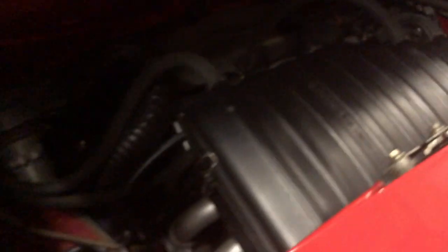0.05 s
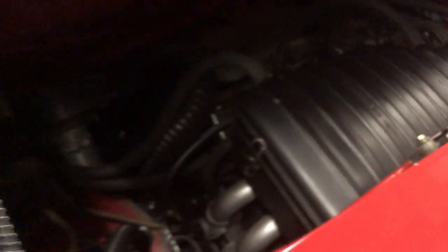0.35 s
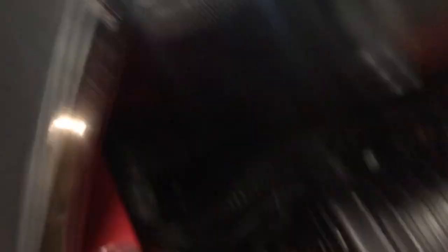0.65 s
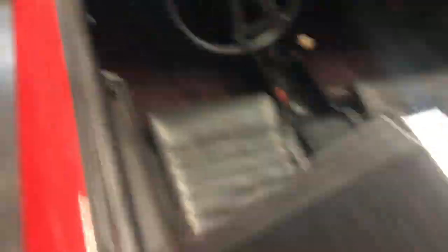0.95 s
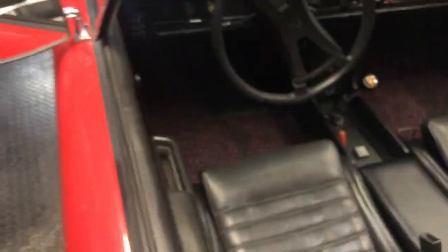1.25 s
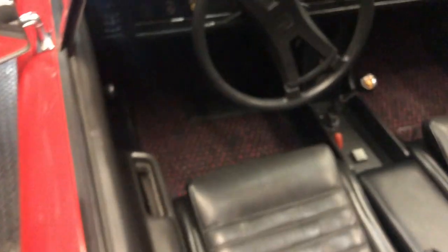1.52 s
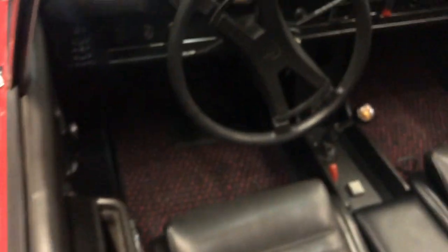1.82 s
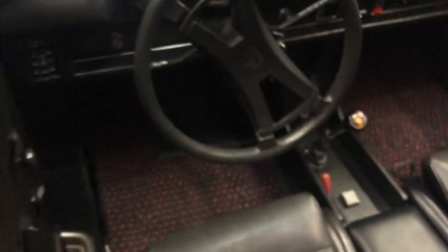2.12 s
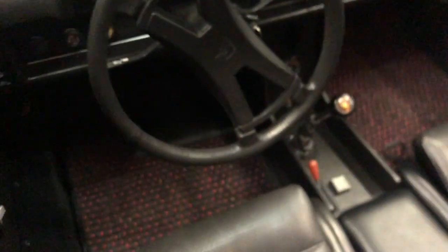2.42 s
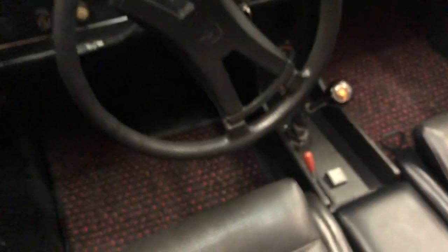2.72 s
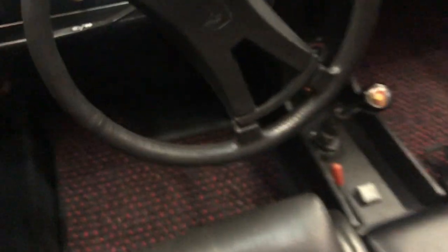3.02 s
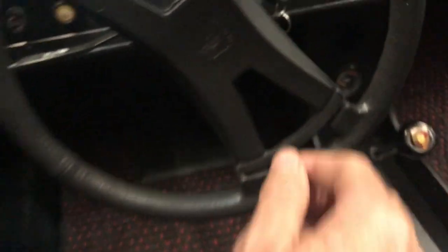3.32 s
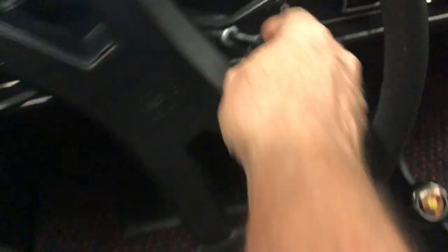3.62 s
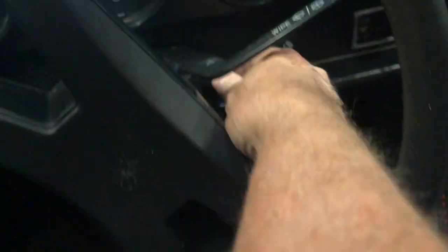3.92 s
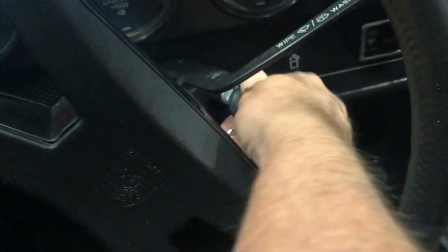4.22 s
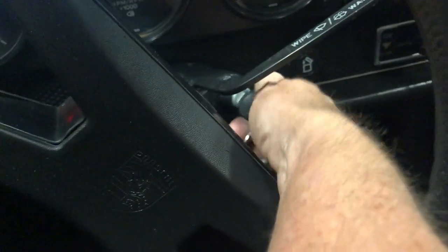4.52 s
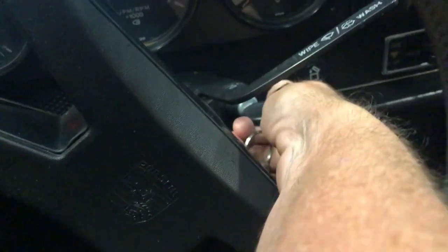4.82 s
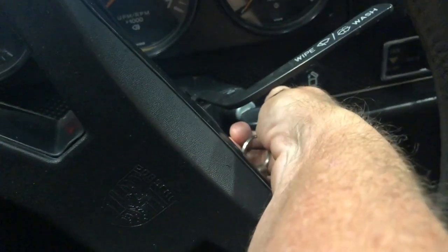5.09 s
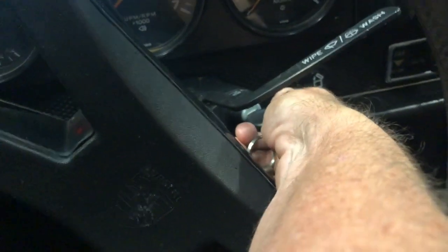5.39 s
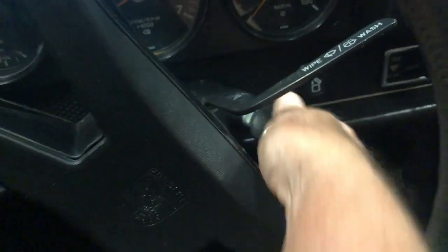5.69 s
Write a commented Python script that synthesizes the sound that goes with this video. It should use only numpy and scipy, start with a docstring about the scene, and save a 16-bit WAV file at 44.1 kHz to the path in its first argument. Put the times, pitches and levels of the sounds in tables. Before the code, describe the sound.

A sleeve rustles and a key clicks into a car ignition, then the starter whines and cranks until the engine catches.

```python
"""Cold start of a sports car

In a garage, heard from the open driver's door, a sleeve rustles over the ventilation.
The key slides into the lock and turns. The starter's gears whine, rasping as the pistons squeeze air.
The cylinders catch one by one, and their puffs ring the exhaust until the engine swells into a roar."""
import sys
import numpy as np
from scipy import signal
from scipy.fft import rfft, irfft, next_fast_len
from scipy.io import wavfile
from scipy.ndimage import uniform_filter1d

SR = 44100
rng = np.random.default_rng(int(sys.argv[2]) if len(sys.argv) > 2 else 0)


def master_out(mix):
    """Clip the mix to full scale and print it as 16-bit PCM to the path in sys.argv[1]."""
    frames = np.transpose(np.atleast_2d(mix))
    ceiling = np.clip(frames, -1, 1)
    pcm = np.round(ceiling * 32767).astype(np.int16)
    wavfile.write(sys.argv[1], SR, pcm)


N = 253575
TIME = np.arange(N) / SR
COMPRESSION_S = 0.142  # time from one squeeze of a piston to the next
CATCH_S, UNLOAD_S = 5.33, 0.07  # when the engine takes over from the starter, and how long that takes

# The hiss of sliding cloth or metal. Each row: pitch in Hz, relative level in dB.
FRICTION_SPECTRUM = [(700, 3.5), (1500, -7.5), (2500, -3.5), (4500, -4), (7000, -7), (11000, -10),
                     (16000, -12.5)]
# Surges of effort, first against compression, then as cylinders catch.
# Each row: start in seconds, hold in seconds, force in dB, gear rasp in dB.
EFFORT_SURGES = [(4.624, 0.0058, -35.5, -37), (4.734, .005, -46.5, -34.5), (4.804, 0.032, -42, -62),
                 (4.858, 0.0069, -35.5, -39), (4.945, 0.045, -36.5, -56), (5.032, .11, -37.5, -52.5),
                 (5.208, 0.079, -37.5, -64), (5.33, 0.076, -31.5, -43.5), (5.453, 0.11, -28.5, -37.5),
                 (5.598, .075, -29, -34)]
# The notes at which the exhaust rings in the garage. Each row: pitch in Hz, width in Hz, gain in dB.
EXHAUST_RESONANCES = [(43.7, 8.1, -5), (57, 6.2, 1), (73.3, 14, 3), (87.7, 12, -4), (132.7, 9.1, -3),
                      (143.6, 5.2, 0), (207, 15, -1.5), (237, 11, -14), (274, 25, -18)]


def amp(db):
    """Turn decibels into a gain."""
    return 10 ** (np.asarray(db) / 20)


def unit(x):
    """Scale x to an average (rms) level of 1."""
    return x / np.sqrt(np.mean(x ** 2))


def curve(table):
    """Join (seconds, value) points with straight lines, one value a sample."""
    return np.interp(TIME, *np.transpose(table))


def noise():
    """White noise, an even hiss."""
    return rng.standard_normal(N)


def wander(rate):
    """A random drift of size about 1 that changes rate times a second."""
    hold = int(SR / rate)
    steps = np.repeat(rng.standard_normal(N // hold + 1), hold)
    return unit(uniform_filter1d(steps, hold)[:N])


def colour(x, spectrum):
    """Shape the lows and highs of x with (Hz, dB) points; the result has level 1."""
    hz, db = np.transpose(spectrum)
    size = next_fast_len(2 * N)
    bin_hz = np.maximum(np.fft.rfftfreq(size, 1 / SR), 1)
    gain = amp(np.interp(np.log(bin_hz), np.log(hz), db))
    return unit(irfft(rfft(x, size) * gain, size)[:N])


def band(x, hz, width):
    """One resonance: keep a band of x, width Hz wide, around hz."""
    hz = min(hz, .45 * SR)
    angle = 2 * np.pi * hz / SR
    damping = np.sin(angle) * width / hz / 2
    feedback = [1 + damping, -2 * np.cos(angle), 1 - damping]
    return signal.lfilter([damping, 0, -damping], feedback, x + 1e-18)


def resonate(x, modes):
    """Let x ring several resonances side by side."""
    return sum(amp(db) * band(x, hz, width) for hz, width, db in modes)


def fade(t60, rise):
    """Times and a loudness shape that grows for rise seconds, then drops 60 dB in t60 seconds."""
    t = TIME[:SR // 2]
    attack = np.sin(np.pi / 2 * np.minimum(t / rise, 1)) ** 2
    return t, attack * np.exp(-np.log(1000) * np.maximum(t - rise, 0) / t60)


def swell(s, length):
    """A smooth rise and fall around s seconds."""
    return np.exp(-2 * ((TIME - s) / length) ** 2)


def surge(s, hold, t60, rise=0.025):
    """One surge of effort rises at s seconds, holds and dies away."""
    t = TIME - s
    attack = np.sin(np.pi / 2 * np.clip(t / rise, 0, 1)) ** 2
    return attack * np.exp(-np.log(1000) * np.maximum(t - rise - hold, 0) / t60)


def add(out, s, x):
    """Mix x into out at s seconds."""
    start = min(int(s * SR), N)
    out[start:start + len(x)] += x[:N - start]


def garage(x, t60, wet_db):
    """Add dense echoes from the cabin and the walls, at wet_db relative to x."""
    t, envelope = fade(t60, rise=0.0088)
    echo = envelope * rng.standard_normal(len(t))
    return x + amp(wet_db) * signal.fftconvolve(x, echo / np.linalg.norm(echo))[:N]


def ventilation(air_db=-61, hum_far_db=-66.5, hum_near_db=-59.5):
    """Moving air, a motor hum and fan tones change as the listener walks to the door."""
    # The rush of air. Each row: pitch in Hz, relative level in dB.
    air_spectrum = [(15, -21), (25, -3.5), (64, 3), (180, -2.5), (236, -4), (301, -5), (365, -8), (460, -5),
                    (607, -5.5), (796, -12), (960, -12), (1480, -24), (4610, -29), (14800, -39),
                    (16000, -37)]
    # Fan tones, each loudest at one spot on the way.
    # Each row: pitch in Hz, level in dB, loudest moment in seconds, spread in seconds.
    fan_tones = [(183, -67, 1.6, .5), (237, -68, 1.02, 0.33), (296.5, -71, 0.97, 1.2),
                 (601, -67.5, 0.85, 0.31), (600, -65.5, 1.68, 0.44)]
    passing_fan_db = 2.5 * swell(1.09, length=1.68)
    air = colour(noise(), air_spectrum) * amp(air_db + passing_fan_db + 0.25 * wander(12))
    air = signal.sosfilt(signal.butter(2, 35, "highpass", fs=SR, output="sos"), air)
    near_door = .5 + .5 * np.tanh((TIME - 1.83) / 0.31)
    hum_db = hum_far_db + (hum_near_db - hum_far_db) * near_door
    hum = np.sqrt(2) * np.sin(2 * np.pi * 56.6 * TIME + 0.28 * wander(6.7))
    air += hum * amp(hum_db + 2.8 * wander(7.5))
    # at one spot the garage's standing wave cancels most of the bass
    bass = signal.sosfiltfilt(signal.butter(2, 140, fs=SR, output="sos"), air)
    air -= 0.82 * swell(1.07, length=0.35) * bass
    for hz, db, s, spread in fan_tones:
        nearness = 1 / (1 + ((TIME - s) / spread) ** 2)
        level = nearness * amp(db + 1.6 * wander(5.83))
        air += level * np.sqrt(2) * np.sin(2 * np.pi * hz * TIME + 0.63 * wander(12))
    return air


def sleeve(rest_db=-78, creaks_per_s=45, creak_db=-15):
    """Cloth slides with a soft, grainy hiss and tiny creaks."""
    # One swish for each move of the arm. Each row: middle in seconds, length in seconds, level in dB.
    swishes = [(.2, .22, -76), (0.578, 0.13, -67.5), (0.817, 0.067, -68.5), (0.968, 0.13, -66),
               (1.212, 0.26, -64.5), (1.483, 0.096, -66), (1.73, 0.34, -67.5), (2.308, 0.2, -68),
               (2.51, 0.061, -67), (2.853, 0.32, -64), (3.225, 0.27, -66), (3.702, 0.53, -71)]
    swish_power = sum((amp(db) * swell(s, length)) ** 2 for s, length, db in swishes)
    motion = np.sqrt(swish_power + (amp(rest_db) * swell(4.1, length=3.5)) ** 2)
    hiss = colour(noise() * amp(0.77 * wander(300)), FRICTION_SPECTRUM)
    snags = 1. * (rng.random(N) < creaks_per_s / SR)
    creaks = unit(band(snags, hz=2410, width=320))
    return motion * (hiss + amp(creak_db) * garage(creaks, t60=0.22, wet_db=-4.5))


def key_slide(db=-57):
    """The key's blade scrapes over the pins of the lock."""
    return colour(noise(), FRICTION_SPECTRUM) * amp(db) * swell(4.155, length=.07)


def key_ticks(gain_db=-15):
    """The key is handled, finds the slot and turns; each contact rings its metal."""
    # Small contacts. Each row: start in seconds, relative level in dB, pitch in Hz, fade in seconds.
    contacts = [(1.475, -50, 2620, .1), (2.197, -48.5, 900, .03), (2.709, -46.5, 1300, .05),
                (3.298, -35, 3130, .055), (3.569, -42.5, 700, .05), (3.586, -45, 940, 0.17),
                (3.721, -46.5, 1700, 0.038), (3.798, -35.5, 10500, .02), (3.869, -47.5, 7000, 0.096),
                (3.888, -40, 1700, 0.047), (3.938, -39.5, 5200, .026), (3.994, -47.5, 6500, .025),
                (4.079, -29, 3270, .034), (4.117, -31.5, 4830, 0.079), (4.130, -27.5, 9900, .05),
                (4.149, -27.5, 3940, 0.034), (4.181, -30, 14300, .045), (4.184, -29, 3480, 0.065),
                (4.558, -35.5, 4200, 0.086), (4.581, -23.5, 7100, 0.049), (4.594, -37, 2296, 0.12)]
    # The notes of the blade and key ring. Each row: pitch in Hz, width in Hz, gain in dB.
    key_resonances = [(2036, 45, 12.5), (2530, 50, 11), (3370, 61, 10), (4130, 70, -1), (4980, 60, 0),
                      (8600, 95, -10), (11600, 400, 3), (15000, 2000, 9)]
    ticks = np.zeros(N)
    for s, db, hz, t60 in contacts:
        t, envelope = fade(t60, rise=0.0014)
        tick = unit(band(rng.standard_normal(len(t)), hz, width=0.79 * hz))
        add(ticks, s, amp(db + gain_db) * envelope * tick)
    return ticks + amp(-8.5) * resonate(ticks, key_resonances)


def steering_column(trim_db=-8.5):
    """Firm key contacts and the starter's jolts ring the column; loose trim buzzes along."""
    # Knocks that reach the column. Each row: start in seconds, level in dB.
    knocks = [(3.591, -49), (3.75, -50.5), (3.89, -49.5), (4.082, -33.5), (4.14, -40.5), (4.158, -40),
              (4.201, -46), (4.561, -39.5), (4.588, -41.5), (4.621, -36), (4.642, -36), (4.659, -28.5),
              (4.955, -33.5), (5.466, -25.5)]
    # The column's own notes. Each row: pitch in Hz, relative level in dB, fade in seconds.
    column_modes = [(199.6, -3, 0.22), (366, 0.5, 0.13), (439, 3, 0.054), (543, -6, 0.086),
                    (668, -12, 0.39), (882, -7.5, 0.044)]
    out = np.zeros(N)
    for s, db in knocks:
        ring = 0
        for hz, mode_db, t60 in column_modes:
            t, envelope = fade(t60, rise=0.0017)
            detuned_hz = hz * (1 + 0.021 * rng.standard_normal())
            ring += amp(mode_db) * envelope * np.sin(2 * np.pi * detuned_hz * t)
        t, envelope = fade(t60=0.083, rise=0.002)
        buzz = band(rng.standard_normal(len(t)), hz=420, width=700)
        trim = envelope * unit(band(buzz, hz=390, width=700))
        add(out, s, amp(db) * (ring / np.abs(ring).max() + amp(trim_db) * trim))
    return out


def body_shell():
    """The car's body booms when leant on and when the starter kicks the engine on its mounts."""
    # Soft bumps. Each row: start in seconds, peak level in dB, pitch in Hz, fade in seconds.
    bumps = [(3.167, -45.5, 137, 0.26), (3.198, -44, 146, 0.077), (4.09, -55, 127, 0.7),
             (4.646, -38, 258, 0.15), (4.661, -27.5, 237, .063), (4.677, -25, 74, 0.26),
             (4.734, -28.5, 71, .16), (4.822, -37, 66, .18)]
    out = np.zeros(N)
    for s, db, hz, t60 in bumps:
        t, envelope = fade(t60, rise=0.0057)
        add(out, s, amp(db) * envelope * np.sin(2 * np.pi * hz * t))
    return out


def starter(whine_db=-46, swell_db=6.5, unload_db=-6, gear_teeth=9):
    """The gears whine, louder at each compression and softer once the engine catches; surges rasp."""
    # How fast the gear teeth meet. Each row: time in seconds, pitch in Hz.
    gear_pitch = [(4.62, 560.3), (4.69, 875), (4.78, 895), (4.85, 955), (4.93, 990), (5.02, 1064),
                  (5.12, 1052), (5.3, 1052), (5.75, 1029)]
    running = np.clip((TIME - gear_pitch[0][0]) / 0.17, 0, 1)
    compression = np.cos(2 * np.pi * (TIME - 5.024) / COMPRESSION_S)
    caught = np.clip((TIME - CATCH_S) / UNLOAD_S, 0, 1)
    db = whine_db + swell_db * compression + unload_db * caught
    hz = curve(gear_pitch) * (1 - .012 * compression)  # the motor slows under load
    phase = 2 * np.pi * np.cumsum(hz) / SR + 0.67 * wander(83)
    flutter = 1 + .5 * np.cos(phase / gear_teeth)  # uneven teeth come round once a turn
    whine = np.sqrt(2) * np.sin(phase) * flutter * amp(db + 4.1 * wander(70)) * running
    whine = garage(whine, t60=0.23, wet_db=-4.5)
    # The rasp of loaded gears. Each row: pitch in Hz, relative level in dB.
    rasp_spectrum = [(900, -10.5), (2500, -2), (4000, 3.5), (6500, -2), (10000, -4.5), (16000, -11.5)]
    load = np.sqrt(sum((amp(rasp_db) * surge(s, hold, t60=0.25)) ** 2
                       for s, hold, _, rasp_db in EFFORT_SURGES))
    tooth_pulse = 1 + 0.4 * np.cos(phase)
    return whine + load * colour(noise() * tooth_pulse, rasp_spectrum)


def machinery(throb):
    """Chains and valves rattle against the engine's cast metal parts."""
    # The clatter. Each row: pitch in Hz, relative level in dB.
    clatter_spectrum = [(100, 0.5), (230, -0.5), (300, -4), (450, 0.5), (530, -9.5), (620, 1), (1050, 1),
                        (1200, -6.5), (1500, -7), (2000, -13.5), (3000, -15.5), (8000, -48)]
    # The notes of the cast parts. Each row: pitch in Hz, width in Hz, relative gain in dB.
    casting_resonances = [(606, 32, -0.5), (739, 8.5, 3), (778.4, 15, 7), (890, 19, -5), (941, 24, -4),
                          (1025, 15, 5), (1135, 31, -3.5), (1331, 18, 1.5), (1473, 11, 4.5), (1585, 20, -5),
                          (1940, 14, -4.5), (2355, 17, -3.5), (3164, 18, -2.5), (3290, 65, -9.5),
                          (3490, 20, -10), (3580, 32, -3), (3920, 21, -2), (4230, 24, -5.5), (5265, 25, -8)]
    clatter = colour(noise() * amp(2.45 * wander(900)) * throb, clatter_spectrum)
    ringing = unit(resonate(noise() * throb, casting_resonances))
    return amp(-2) * clatter + amp(-4) * ringing


def gas_rush(throb, force, gas_db=-33.5, full_force_db=-28):
    """Gas hisses in time with the strokes, and harder as the force grows."""
    # The hiss of the gas. Each row: pitch in Hz, relative level in dB.
    gas_spectrum = [(900, -9.5), (1900, -2.5), (2600, -6), (3300, -0.5), (4800, -3), (7000, -8.5),
                    (10000, -17), (16000, -32)]
    gas = colour(noise() * throb * amp(1.4 * wander(500)), gas_spectrum)
    level = amp(gas_db) * (force / amp(full_force_db)) ** 1.38
    return level * garage(gas, t60=0.25, wet_db=-1.5)


def exhaust_rumble(cycle):
    """One puff each turn rings the pipes; the result is held near level 1."""
    puffs = noise() * (0.22 + np.exp(-cycle / 0.59))
    low_band = signal.butter(4, [42, 320], "bandpass", fs=SR, output="sos")
    rumble = signal.sosfilt(low_band, resonate(puffs, EXHAUST_RESONANCES))
    return rumble / np.sqrt(uniform_filter1d(rumble ** 2, size=3000) + 1e-12)


def firings(cycle, rumble_db, scatter_db=2.5, width_s=0.0022):
    """Cold cylinders fire unevenly: round pressure pulses, one a turn plus bangs, ring the exhaust."""
    # The hardest bangs. Each row: time in seconds, strength in dB before the pipes shape it.
    bangs = [(5.024, -35), (5.066, -35), (5.197, -26), (5.320, -29), (5.404, -24.5), (5.424, -23.5),
             (5.511, -22.5), (5.550, -13.5), (5.605, -20), (5.668, -15), (5.689, -8.5), (5.73, -10.5)]
    turns = np.flatnonzero(np.diff(cycle) < 0)
    turn_db = rumble_db[turns] - 1 + scatter_db * rng.standard_normal(len(turns))
    t = TIME[:SR // 40]
    middle = t.mean()
    pulse = np.exp(-((t - middle) / width_s) ** 2)
    pulses = np.zeros(N)
    for s, db in [*zip(TIME[turns], turn_db), *bangs]:
        add(pulses, s - middle, amp(db) * pulse)
    pulses -= uniform_filter1d(pulses, size=1100)  # the gas swings back: suction on either side
    return 0.97 * band(pulses, hz=70, width=420) + amp(-1) * resonate(pulses, EXHAUST_RESONANCES)


def firing_tone(cycle, speed, firings_per_turn=3, db_per_doubling=41):
    """At speed the firings of six cylinders merge into a tone."""
    db = -25.5 + db_per_doubling * np.log2(speed / 48) + 1.5 * wander(30)
    return np.sqrt(2) * amp(db) * np.sin(2 * np.pi * firings_per_turn * cycle + 0.22 * wander(40))


def engine(between_surges_db=-42.5, chug_db=3.5, rumble_db_per_doubling=8):
    """The crankshaft drives it all: effort raises the clatter and hiss, speed raises the exhaust."""
    # How fast the crankshaft spins. Each row: time in seconds, turns per second.
    crank_speed = [(4.62, 11.2), (4.8, 9.6), (4.99, 9.5), (5.05, 17.2), (5.3, 21.3), (5.42, 33),
                   (5.53, 40.7), (5.68, 46.5), (5.75, 53.3)]
    speed = curve(crank_speed)
    turning = np.clip((TIME - crank_speed[0][0]) / .03, 0, 1)
    cycle = np.cumsum(speed * turning) / SR % 1  # runs from 0 to 1 in each turn
    throb = 1 + 0.1 * np.cos(2 * np.pi * cycle)
    surge_power = sum((amp(db) * surge(s, hold, t60=0.42)) ** 2 for s, hold, db, _ in EFFORT_SURGES)
    force = np.sqrt(amp(between_surges_db) ** 2 + surge_power)
    clatter_and_hiss = force * machinery(throb) + gas_rush(throb, force)
    # until the engine catches, the exhaust chugs once between compressions
    cranking = np.clip((CATCH_S + UNLOAD_S - TIME) / UNLOAD_S, 0, 1)
    chug = cranking * np.cos(2 * np.pi * (TIME - 5.07) / COMPRESSION_S)
    rumble_db = -28 + rumble_db_per_doubling * np.log2(speed / 45.7) + chug_db * chug
    rumble = amp(rumble_db) * exhaust_rumble(cycle)
    thumps = firings(cycle, rumble_db)
    return turning * (clatter_and_hiss + rumble + firing_tone(cycle, speed)) + thumps


def scene():
    """Add up all the sounds, the same for the left and right ear."""
    mono = ventilation() + sleeve() + key_slide()
    mono += garage(key_ticks() + steering_column(), t60=0.18, wet_db=-10.5)
    mono += body_shell() + starter() + engine()
    return np.array([mono, mono])


def record(dry, top_hz=16200):
    """Cut away the very highest treble."""
    return signal.sosfilt(signal.ellip(10, .2, 70, top_hz, fs=SR, output="sos"), dry)


dry = scene()
out = record(dry)
master_out(out)
```